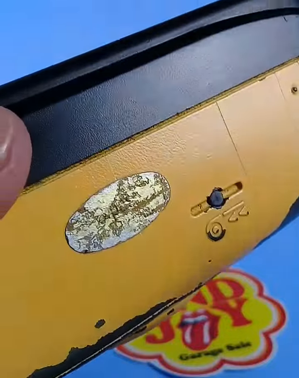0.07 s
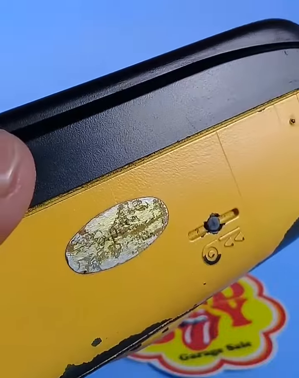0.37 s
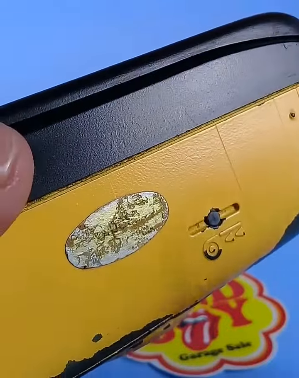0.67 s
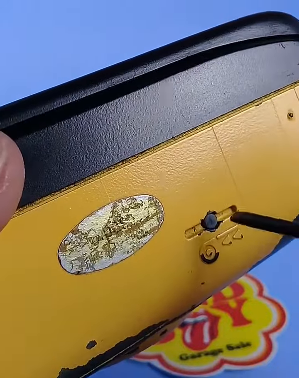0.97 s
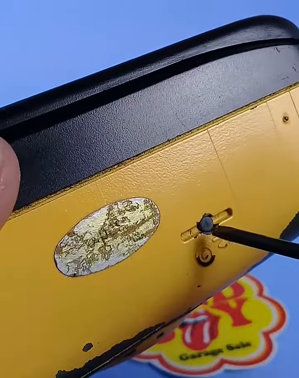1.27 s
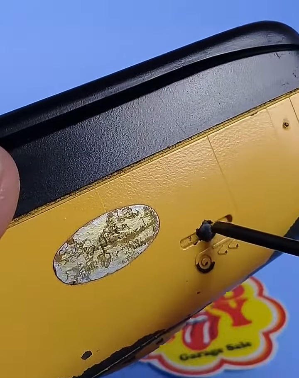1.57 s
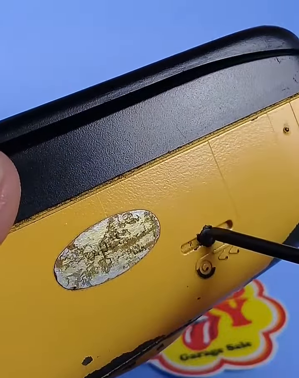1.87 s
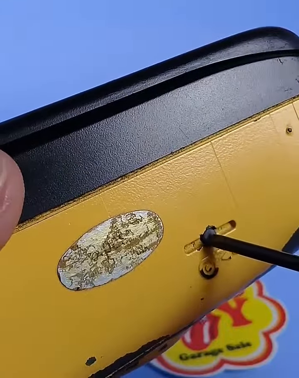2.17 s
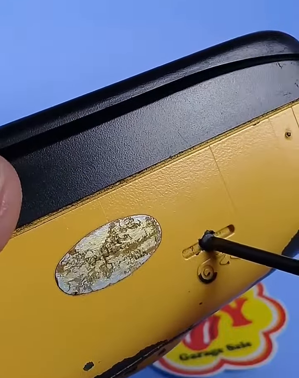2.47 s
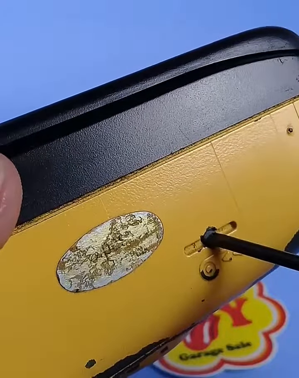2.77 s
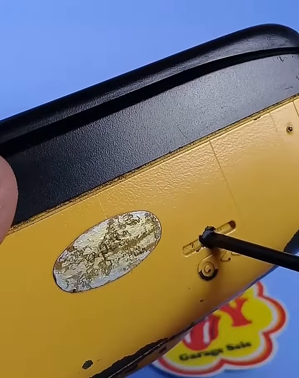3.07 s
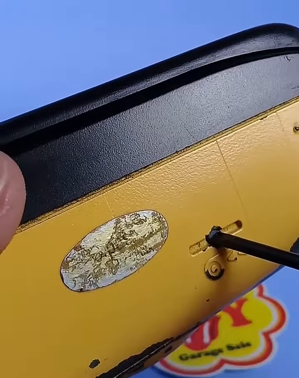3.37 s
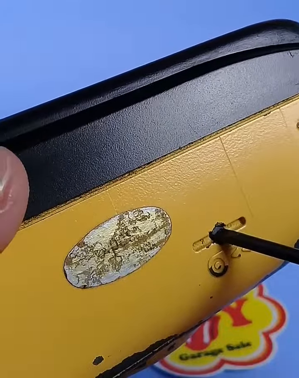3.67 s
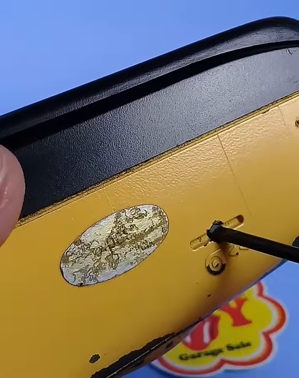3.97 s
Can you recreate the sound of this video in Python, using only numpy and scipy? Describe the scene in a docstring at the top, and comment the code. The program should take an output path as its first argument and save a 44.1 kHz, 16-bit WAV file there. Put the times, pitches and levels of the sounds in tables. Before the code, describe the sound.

A small camera motor whirs close up, but only near the end. First there is a quiet room with a faint hum and low flutter, and a few soft handling ticks around 0.3 to 0.5 seconds. A switch clicks lightly at 3 seconds. At about 3.4 the motor rises to a high whine with rattling gears, snaps loudly at 3.7, and runs steadily until 4 seconds.

```python
"""In a quiet room, a tool pushes the rewind switch of a small plastic camera held close.
A faint fan-like hum and a low flutter lie underneath. After a few handling ticks and a click,
the motor spins up, overshoots, takes up its load with a snap and whines on steadily.
Meshing teeth give the tones and dense contacts the rattle; both sound through one strong
resonance of the case."""
import sys
import numpy as np
from scipy import signal
from scipy.fft import rfft, irfft
from scipy.io import wavfile

SR = 44100
rng = np.random.default_rng(int(sys.argv[2]) if len(sys.argv) > 2 else 0)


def unload_audio(sound):
    """Save the sound as a 16-bit wav file, at the path given as the first command line argument."""
    columns = np.transpose(np.atleast_2d(sound))
    # keep every value between -1 and 1, then stretch to whole-number steps
    steps = np.round(np.clip(columns, -1, 1) * 32767)
    wavfile.write(sys.argv[1], SR, steps.astype(np.int16))


N = 176400
T = np.arange(N) / SR


def from_db(db):
    """Amplitude ratio of a level in decibels."""
    return 10 ** (np.asarray(db) / 20)


def unit_rms(x):
    """Normalisation to unit mean power."""
    return x / np.sqrt(np.mean(np.abs(x) ** 2) + 1e-20)


def in_time(rows, t=T):
    """Linear interpolation of a table's columns at times t."""
    times, *columns = np.transpose(rows)
    return [np.interp(t, times, column) for column in columns]


def coloured(x, spectrum):
    """Minimum-phase filtering: folding the cepstrum makes a response (f/Hz, level/dB) causal."""
    size = 2 * len(x)
    hz, db = np.transpose(spectrum)
    bin_hz = np.maximum(np.arange(len(x) + 1) * SR / size, 1)
    gain = from_db(np.interp(np.log(bin_hz), np.log(hz), db))
    cepstrum = irfft(np.log(gain))
    cepstrum[1:len(x)] *= 2
    cepstrum[len(x) + 1:] = 0
    return irfft(rfft(x, size) * np.exp(rfft(cepstrum)))[:len(x)]


def drift(hz):
    """Random modulation: complex Gaussian noise of unit rms, low-passed at hz."""
    f = np.fft.fftfreq(N, 1 / SR)
    white = rng.standard_normal(N) + 1j * rng.standard_normal(N)
    return unit_rms(np.fft.ifft(white / (1 + (f / hz) ** 2)))


def widen(mid, side):
    """Mid-side stereo: the channels are alike in the bass and partly decorrelated in the treble."""
    # side relative to mid: f/Hz, level/dB
    width = [(3500, -68), (5000, -26.5), (7000, 2), (9000, -3), (15000, -3)]
    return mid + coloured(side, width) * np.array([[1], [-1]])


def room_hiss():
    """Comb filtering: six reflections from near walls ripple the spectrum of a steady hiss."""
    # spectral density of the hiss: f/Hz, relative level/dB
    air_spectrum = [(120, -17.5), (200, -5.5), (275, 0), (390, -10.5), (600, -12), (900, -14), (1100, -10),
                    (1260, -11.5), (1400, -12), (1600, -19), (1760, -3), (1950, -20.5), (2130, -15),
                    (2330, -27), (2470, -13), (2600, -20.5), (2850, -7.5), (3100, -6.5), (3400, -12),
                    (3720, -21.5), (3890, -12.5), (4050, -24), (4400, -26.5), (5080, -25), (5210, -20.5),
                    (5330, -25.5), (5600, -26), (5800, -30), (7620, -34), (9300, -42.5), (15500, -56)]
    air = coloured(rng.standard_normal(N), air_spectrum)
    air = signal.sosfilt(signal.butter(2, 200, "high", fs=SR, output="sos"), air)
    reflections = sum(np.roll(air, int(delay_s * SR)) for delay_s in rng.uniform(0, .02, 6))
    return from_db(-48) * unit_rms(air + from_db(-15) * reflections)


def hum():
    """Narrow-band modulation: faint tones, as from a fan, waver slowly in amplitude and phase."""
    # partials: f/Hz, level/dB
    partials = [(300, -66), (500, -70), (700, -77.5), (802, -66.5), (1200, -73.5), (1270, -64.5),
                (1733, -61.5), (3095, -66), (3472, -68), (3569, -64), (3881, -69)]
    out = 0
    for hz, db in partials:
        waver = 1 + .49 * drift(hz=2.3)
        out += from_db(db) * unit_rms((waver * np.exp(2j * np.pi * hz * T)).real)
    return out


def throb(hz, t, rise_s=.0073, lag_s=.0168):
    """Damped oscillation: a softly started low ring, followed by a lower and weaker one."""
    def ring(age, ring_hz):
        return (age / rise_s) ** 2 * np.exp(-age / rise_s) * np.sin(2 * np.pi * ring_hz * age)

    return ring(t, hz) + from_db(-10) * ring(np.maximum(t - lag_s, 0), .716 * hz)


def flutter(throbs_per_s=21.2, scatter_db=1.5, drone_hz=131.6, fade_s=.23, size=4096):
    """A jittered pulse train: throbs in a rumble, now even, now stumbling, grow out of a fading tone."""
    # pitch and strength of the throbs: t/s, f/Hz, relative level/dB
    course = [(0.0, 126, -19.5), (0.33, 150, -44.5), (0.43, 133, -40), (0.92, 118, -41.5),
              (1.34, 142, -40.5), (1.44, 122, -36), (1.66, 120, -43.5), (1.7, 101, -46.5),
              (1.79, 124.5, -39), (1.89, 98.6, -40.5), (2.05, 123, -44), (2.31, 122, -38.5),
              (2.64, 111.7, -41.5), (2.78, 111.2, -39), (3.23, 109, -44.5), (3.4, 103.6, -36),
              (3.73, 110.6, -48), (4.0, 105.8, -44)]
    # unevenness of their timing: t/s, standard deviation/s
    jitter = [(1.3, 0.00059), (1.6, 0.0042), (2.05, 0.00015), (3.0, 0.00046), (3.15, 0.0064)]
    # spectral density of the rumble: f/Hz, relative level/dB
    rumble_spectrum = [(30, -41), (52, -29.5), (72, -2.5), (100, -2), (155, 6), (210, -14), (300, -26),
                       (500, -42), (1500, -67.5)]
    throbs = np.zeros(N + 2 * size)
    for beat_s in np.arange(0, N / SR, 1 / throbs_per_s):
        late, loud = rng.standard_normal(2)
        hz, _ = in_time(course, beat_s)
        onset_s = beat_s + late * in_time(jitter, beat_s)[0]
        start = int(np.clip(onset_s, 0, N / SR) * SR)
        throbs[start:start + size] += from_db(scatter_db * loud) * throb(hz, T[:size])
    rumble = from_db(-6) * unit_rms(coloured(rng.standard_normal(N), rumble_spectrum))
    throbbing = from_db(in_time(course)[1] + 2) * (unit_rms(throbs[:N]) + rumble)
    throbbing = signal.sosfilt(signal.butter(4, 66, "high", fs=SR, output="sos"), throbbing)
    drone = from_db(-29) * unit_rms(np.sin(2 * np.pi * drone_hz * T))
    fade = np.exp(-(T / fade_s) ** 2)
    return (1 - fade) * throbbing + fade * drone


def handling_ticks(rub_centre_s=.42, rub_half_width_s=.17, scratch_decay_s=.004, size=2048):
    """Modal ringing: slips, each trailed by a brief scratch, and faint rubbing excite high modes."""
    # slips: t/s, relative level/dB
    slips = [(.24, -60), (0.276, -49), (.364, -62), (.38, -51), (.493, -44.5), (0.5132, -38)]
    # modes: f/Hz, relative level/dB, time to fall 60 dB/s
    modes = [(5060, -7.5, 0.019), (10050, -4, .016), (9900, -7, .014), (10700, -13, .006)]
    t = T[:size]
    patches = from_db(-89 + 6.5 * unit_rms(drift(hz=20).real))
    rub_envelope = np.exp(-((T - rub_centre_s) / rub_half_width_s) ** 2)
    friction = patches * rub_envelope * rng.standard_normal(N)
    impulse = t == 0
    for onset_s, db in slips:
        start = int(onset_s * SR)
        scratch = .069 * np.exp(-t / scratch_decay_s) * rng.standard_normal(size)
        friction[start:start + size] += from_db(db) * (impulse + scratch)
    ringing = sum(from_db(db - 60 * t / t60) * np.sin(2 * np.pi * hz * t) for hz, db, t60 in modes)
    return signal.fftconvolve(friction, ringing)[:N] + from_db(3) * friction


def clicks(attack_s=.00013, size=4096):
    """Damped impacts: short cracks in plastic, thin at the switch and fuller in the gears."""
    # impacts: t/s, peak level/dB, decay time/s, lower band edge f/Hz, upper band edge f/Hz
    impacts = [(2.9965, -22.5, 0.0013, 3500, 11700), (3.001, -34, .002, 3000, 8000),
               (3.3434, -31.5, 0.0049, 2980, 4400), (3.6614, -1.5, 0.0021, 347, 15000),
               (3.664, -6, .002, 304, 5940), (3.80, -29.5, 0.0067, 660.5, 1150),
               (3.8504, -23, 0.0031, 6153, 14000), (3.85, -23.5, 0.0043, 680, 1064),
               (3.853, -22, 0.0023, 1780, 3020)]
    # response of the plastic: f/Hz, relative level/dB
    plastic_response = [(150, -22.5), (400, -5), (1400, -3.5), (1650, -3), (2700, 9), (4200, 3), (6000, -2),
                        (8000, -13), (15000, -15.5)]
    out, t = np.zeros((2, N + size)), T[:size]
    for onset_s, db, decay_s, low_hz, high_hz in impacts:
        start = int(onset_s * SR)
        band = signal.butter(2, [low_hz, high_hz], "band", fs=SR, output="sos")
        envelope = (1 - np.exp(-t / attack_s)) * np.exp(-t / decay_s)
        for mid_or_side in out:
            burst = envelope * rng.standard_normal(size)
            crack = signal.sosfilt(band, coloured(burst, plastic_response))
            mid_or_side[start:start + size] += from_db(db) * crack / np.abs(crack).max()
    return widen(*out[:, :N])


def gear_rattle(flicker_db=1.5):
    """Random excitation: dense tooth and brush contacts merge into noise that shakes the case."""
    # strength of the rattle: t/s, level/dB
    strength = [(3.33, -66), (3.35, -47), (3.39, -30), (3.45, -25.5), (3.52, -26.5), (3.6, -24),
                (3.75, -25), (3.88, -26.5), (4.0, -26.5)]
    # its spectral density: f/Hz, relative level/dB
    spectrum = [(200, -42.5), (380, -39), (560, -22.5), (720, -29.5), (950, -23), (1200, -34), (1400, -28),
                (1570, -42), (1800, -30.5), (2030, -30.5), (2300, -27), (2650, -19), (2900, -24.5),
                (3150, -9.5), (3400, -1.5), (3680, -5.5), (4100, -8.5), (4400, -23.5), (4750, -18),
                (5000, -23), (5520, -21), (6300, -31), (8000, -33.5), (8700, -41.5), (9100, -49.5),
                (9700, -38.5), (10900, -36), (12300, -46.5), (14500, -37.5), (15500, -45.5)]
    envelope = from_db(in_time(strength)[0])
    flicker = from_db(flicker_db * unit_rms(drift(hz=150).real))
    mid, side = [unit_rms(coloured(flicker * rng.standard_normal(N), spectrum)) for _ in range(2)]
    return widen(envelope * mid, envelope * side)


def gear_whine(teeth=32, speed_jitter=.0085, beat_depth=.66):
    """Forced vibration: mesh tones beat with uneven teeth and swell as they cross the case resonance."""
    # tooth-mesh rate from rest, then under way: t/s, f/Hz
    spin_up = [(3.345, 200), (3.38, 1837), (3.392, 2226), (3.41, 2705)]
    running = [(3.43, 3087), (3.462, 3568), (3.494, 3966), (3.534, 4156), (3.558, 4120), (3.592, 3994),
               (3.648, 3608), (3.66, 3560), (3.676, 3753), (3.806, 3685), (3.876, 3608), (3.926, 3687),
               (3.964, 3641), (3.992, 3729)]
    # excitation by the gears: t/s, relative level/dB
    drive = [(3.34, -60), (3.375, -26), (3.397, -14), (3.42, -17), (3.46, -14.5), (3.51, -18), (3.6, -11.5),
             (3.66, -12.5), (3.69, -10), (3.75, -9.5), (3.86, -12), (4.0, -10.5)]
    # gear orders: multiple of the mesh rate, relative level/dB, noise sidebands as a share of the tone
    orders = [(.15625, -12, 0.41), (.3125, 0.5, 0.52), (.5, -2, 0.35), (1, 1, 0.14), (1.5, -4, 0.4),
              (2, -9.5, 0.74), (2.5, -15, 0.87)]
    # response of the case: f/Hz, level/dB
    case_response = [(500, -37.5), (1100, -48.5), (1300, -23.5), (1570, -43), (1850, -33), (2080, -20.5),
                     (2300, -46.5), (2700, -11.5), (2930, -18.5), (3130, -12), (3450, -4), (3680, -0.5),
                     (3950, -4.5), (4150, -4), (4400, -26), (4750, -16.5), (5000, -30), (5500, -26),
                     (6500, -40), (7300, -31), (8200, -24), (11000, -46)]
    mesh_hz, = in_time(list(spin_up) + list(running))
    mesh_hz *= 1 + speed_jitter * drift(hz=120).real
    phase = 2 * np.pi * np.cumsum(mesh_hz) / SR
    # the mesh varies once and twice per turn
    unevenness = unit_rms(sum(np.cos(k * phase / teeth + rng.uniform(0, 2 * np.pi)) for k in (1, 2)))
    tones = 0
    for multiple, db, smear in orders:
        roughness = unit_rms(drift(hz=343).real)
        beat = 1 + beat_depth * np.tanh(.88 * unevenness + .54 * roughness)
        sidebands = smear * drift(hz=55 * max(multiple, 1) ** 2)
        tone = ((beat + sidebands) * np.exp(1j * multiple * phase)).real
        tones += from_db(db) * unit_rms(tone)
    return coloured(from_db(in_time(drive)[0]) * tones, case_response)


def scene():
    """Superposition: the camera, close and central, over the sounds of the room."""
    background = room_hiss() + hum() + flutter()
    return background + handling_ticks() + clicks() + gear_rattle() + gear_whine()


def record(dry, stopband_hz=16700):
    """Clipping and band limiting: peaks stop just under full scale and the highest treble is cut."""
    low_pass = signal.cheby2(14, 70, stopband_hz, fs=SR, output="sos")
    return signal.sosfilt(low_pass, np.clip(dry, -.95, .95))


dry = scene()
out = record(dry)
unload_audio(out)
```